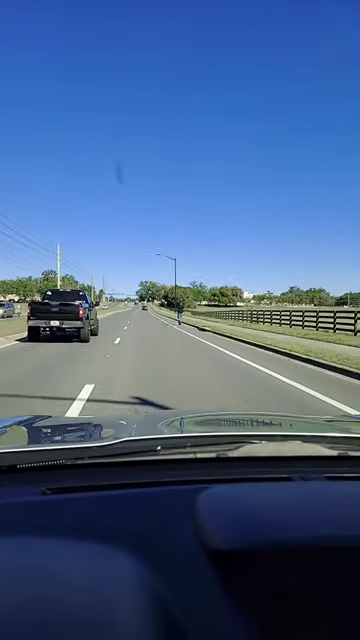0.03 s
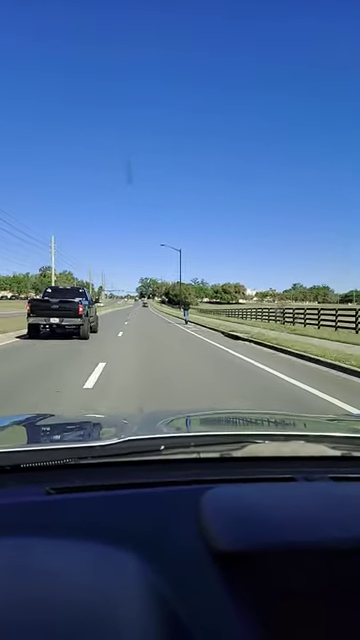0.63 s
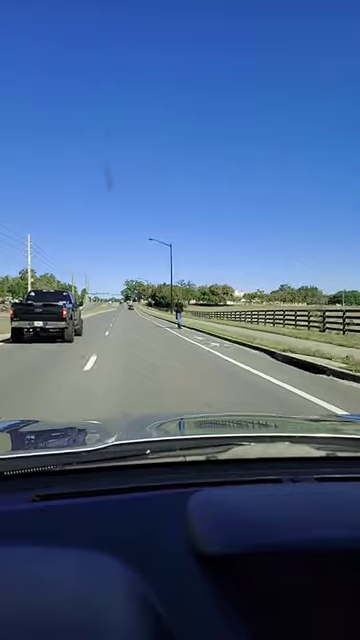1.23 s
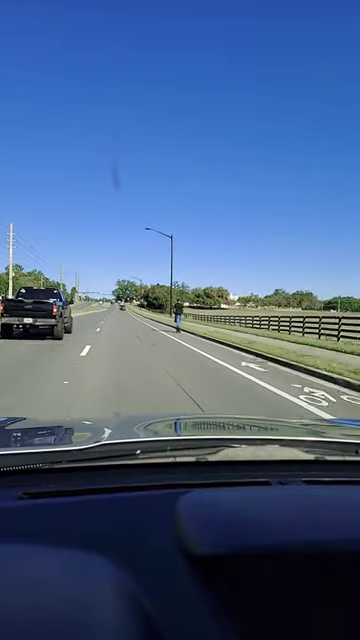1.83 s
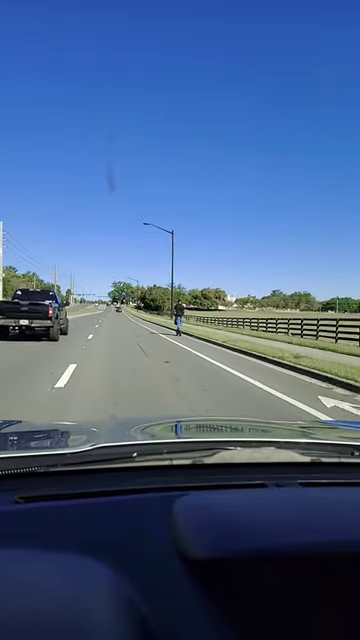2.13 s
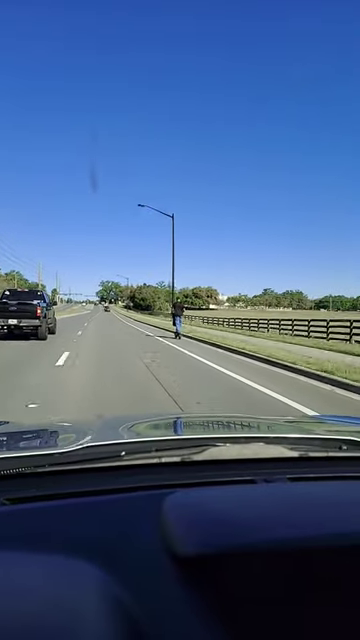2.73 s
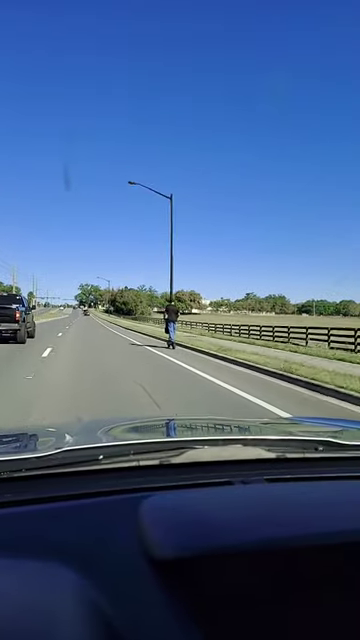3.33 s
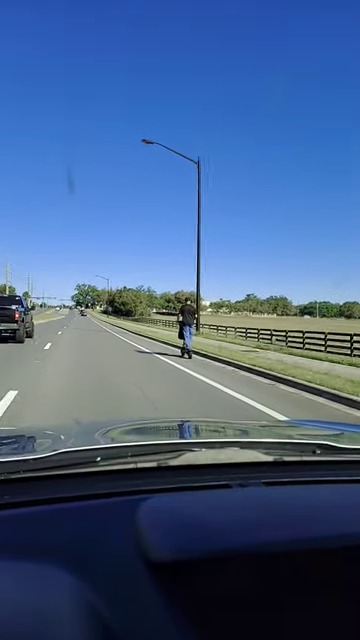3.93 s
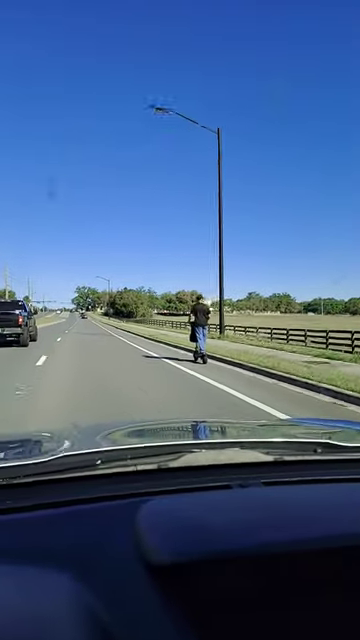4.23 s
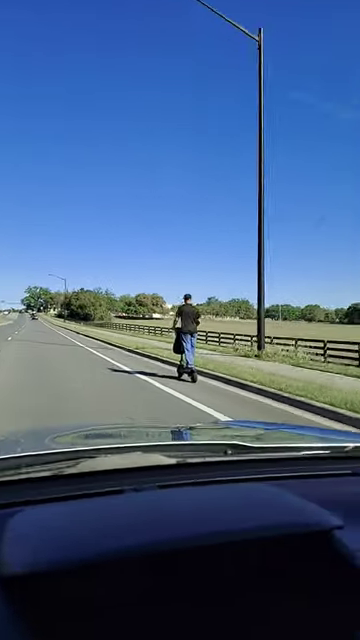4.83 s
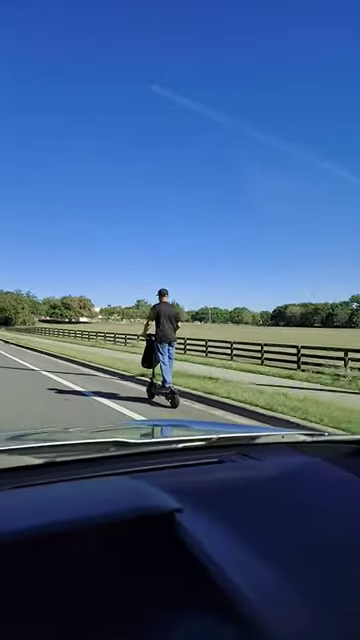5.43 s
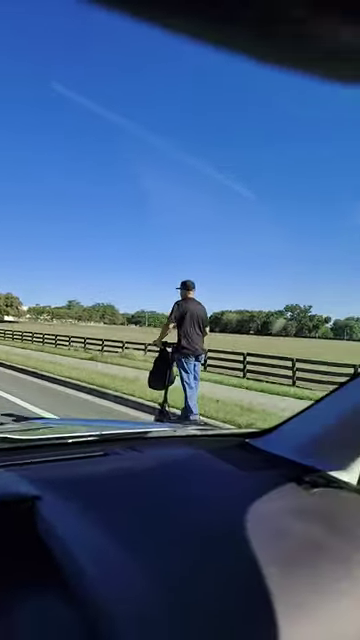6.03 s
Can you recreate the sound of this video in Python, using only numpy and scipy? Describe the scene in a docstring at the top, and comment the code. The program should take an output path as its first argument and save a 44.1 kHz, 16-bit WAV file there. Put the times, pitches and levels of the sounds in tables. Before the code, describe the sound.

A low, booming rumble inside a car cruising along a road, with tyre roar, bumps and wind rushing at an open window.

```python
"""A low, booming rumble fills a car cruising along a multi-lane road, heard from a hand-held phone.
The rough road and its bumps shake the body into that boom, and sharp edges knock through the wheels.
The tyres roar and hum, and air rushes and hisses at the lowered right window.
Stray gusts thump the microphones and pop on the left one, the phone ticks in the hand,
and near the end something gives one tiny squeak."""
import sys
import numpy as np
from scipy import signal
from scipy.fft import rfft, irfft
from scipy.io import wavfile
from scipy.ndimage import uniform_filter1d

SR = 44100
rng = np.random.default_rng(int(sys.argv[2]) if len(sys.argv) > 2 else 0)


def unload_wav(signal):
    """Save mono or channel-first audio to the path in sys.argv[1] as 16-bit WAV at rate SR, clipped to [-1, 1]."""
    wavfile.write(
        sys.argv[1],
        SR,
        np.round(np.clip(np.atleast_2d(signal).T, -1, 1) * 32767).astype(np.int16),
    )


N = 267687
T = np.arange(N) / SR
HZ = np.fft.rfftfreq(N, 1 / SR)

# Levels in the tables are relative: the functions set how loud each layer ends up.
# The path of the squeak. Each row: time in seconds, pitch in Hz, level in dB.
SQUEAK_PATH = [(6.008, 6950, -78), (6.016, 7500, -73), (6.034, 7830, -59), (6.06, 7400, -78)]
# Ticks of the phone case. Each row: time in seconds, level in dB, length of the slip in seconds,
# treble boost in dB per octave.
CASE_TICKS = [(0.647, -51, 0.00056, -7), (3.091, -51, .0005, -4), (3.399, -48, .0016, -4),
              (3.678, -50, 0.0016, -4), (4.2275, -36, .00008, 8), (4.319, -47, .0004, 2)]
# How the case rings. Each row: pitch in Hz, level in dB, seconds to fade by 60 dB.
CASE_RINGS = [(5400, -9, .0014), (8500, -9, 0.0017), (11300, -11, .0016), (13900, -4.5, 0.0026)]
# A fingertip sliding on the case. Each row: time in seconds, level in dB.
FINGER_SLIDE = [(4.33, -81), (4.38, -63), (4.45, -69), (4.54, -62), (4.6, -76)]

# Air speed at the window, given as loudness. Each row: time in seconds, level in dB.
AIR_SPEED = [(0, -42.5), (.6, -43.5), (1.15, -45), (1.5, -42), (2.1, -41), (2.55, -44), (3.2, -43.5),
             (4.1, -43.5), (4.45, -45), (5.0, -43), (5.14, -45), (5.45, -45.5), (5.8, -48.5), (6.07, -47)]
# The tone colour of the rushing air. Each row: frequency in Hz, level in dB.
RUSH_COLOUR = [(500, -3), (800, -4), (1050, 3), (1350, 1), (1650, 0), (1980, 0), (2300, -9.5),
               (2700, -15.5), (3100, -43.5), (5000, -60.5)]
# The tone colour of the hiss. Each row: frequency in Hz, level in dB.
HISS_COLOUR = [(1200, -19), (2500, 8), (3600, 3.5), (5000, 2), (6200, -2), (7300, -3), (8600, -12.5),
               (10000, -13), (12000, -12), (14200, -6.5), (15600, -17)]
# Puffs at the window's edge. Each row: middle and length in seconds, gap and hiss levels in dB.
WINDOW_PUFFS = [(0.25, 0.27, -55, -60), (0.872, 0.13, -46, -58.5), (1.6, 0.1, -49, -54.5),
                (2.249, 0.26, -41, -61.5), (2.745, 0.075, -44, -54), (3.64, .1, -62, -60),
                (3.963, 0.25, -66.5, -58), (4.902, 0.52, -53, -62.5)]
# How the window gap rings in a puff. Each row: pitch in Hz, width in Hz, level in dB.
GAP_RINGS = [(1620, 160, 3.5), (1960, 390, -2.5), (3530, 670, -24.5)]
# How alike the air sounds left and right. Each row: frequency in Hz, likeness (0 is unrelated).
AIR_STEREO = [(1200, 0.0083), (1500, 0.19), (1900, 0.25), (2400, .22), (2800, -0.036), (3200, -0.25),
              (3700, -0.14), (4500, -0.077), (7000, 0)]

# Gusts on the microphones, and one brief low thump on both sides near 0.74 s that goes with a knock from the
# road. Each row: middle and length in seconds, left and right levels in dB.
MIC_GUSTS = [(0.508, 0.073, -17, -22), (0.744, 0.019, -18.5, -19.5), (1.205, 0.044, -15.5, -42),
             (1.57, 0.085, -19, -35.5), (1.672, 0.11, -15.5, -37), (2.297, 0.06, -22, -34),
             (2.764, 0.054, -26, -31), (5.355, 0.32, -27.5, -24.5), (5.554, 0.19, -23, -19.5),
             (5.737, 0.2, -25, -28), (5.93, 0.13, -22.5, -30)]
# The tone colour of a gust. Each row: frequency in Hz, level in dB.
GUST_COLOUR = [(20, -35.5), (38, -8), (65, 7), (110, -1), (190, -6.5), (290, -12.5), (420, -22), (600, -35),
               (2500, -79.5)]
# Swirls of air that pop. Each row: time in seconds, rough half width in seconds, level in dB.
MIC_POPS = [(0.4894, 0.00095, -6), (0.5399, 0.0015, -5), (1.5586, 0.0012, -5), (1.6077, 0.00076, -11.5),
            (1.656, 0.0013, -10), (1.6944, 0.00079, -11), (1.707, 0.00098, -15), (5.499, 0.0028, -11),
            (5.5217, 0.00056, -14), (5.554, 0.0021, -14), (5.5803, 0.001, -11), (5.591, 0.0014, -13)]

# How coarse the asphalt is, given as loudness. Each row: time in seconds, level in dB.
ASPHALT_GRAIN = [(0, -37), (1.3, -39), (2.1, -38), (3.3, -38), (3.9, -39.5), (4.1, -37.5), (5.3, -38),
                 (5.7, -42), (6.07, -39.5)]
# The tone colour of the tyre roar. Each row: frequency in Hz, level in dB.
ROAR_COLOUR = [(200, -17.5), (450, -9.5), (560, 1), (760, 2), (860, -0.5), (960, -2.5), (1200, -7),
               (1600, -15), (2200, -19), (3200, -24.5), (5000, -47.5)]
# Where the tread sings in the roar. Each row: pitch in Hz, width in Hz, level in dB.
TREAD_RINGS = [(630, 41, 11), (790, 48, 8), (900, 60, 4.5), (985, 70, 5)]
# The tread's drifting whine. Each row: time in seconds, pitch in Hz, level in dB.
TREAD_WHINE = [(0, 916, -59.5), (3.5, 918, -56.5), (4.1, 914, -52.5), (4.6, 923, -50.5), (4.88, 966, -46),
               (5.45, 951, -55)]
# How alike the road sounds left and right. Each row: frequency in Hz, likeness (below 0 is opposed).
ROAD_STEREO = [(30, 0.73), (110, 1), (300, 0.93), (430, 0.83), (520, 0.59), (760, 0.57), (880, -0.67),
               (1100, 0.73), (1450, -2.2), (1900, 0.53), (3000, -0.35)]

# Hums of the rolling tyres and the drive. Each row: pitch in Hz, width in Hz, level in dB.
HUM_TONES = [(138.7, 15.9, 1.5), (292.7, 32, -9.5), (316, 8.1, -13)]
# How strong the hum is. Each row: time in seconds, level in dB.
HUM_LEVEL = [(0, -29.5), (1.1, -33), (4.8, -32.5), (5.15, -26.5), (6.07, -31)]
# Sharp edges in the road. Each row: time in seconds, level in dB.
ROAD_EDGES = [(.728, -17.5), (2.137, -18.5), (2.259, -17), (4.327, -14), (5.02, -19.5), (5.561, -14)]
# How the body panels ring. Each row: pitch in Hz, width in Hz, level in dB.
PANEL_RINGS = [(145, 68, 0.5), (192, 46, -4), (215.5, 41, -1.5), (297.3, 35.5, -0.5), (352.3, 32, -10),
               (403, 39, -9.5), (437.4, 15, -8), (487, 84, -13.5)]
# Bumps under the wheels. Each row: time of the hardest shake in seconds, pitch in Hz, level in dB.
ROAD_BUMPS = [(.487, 73.6, -18), (.839, 55, -13), (1.206, 65.7, -18), (1.496, 59, -18), (2.531, 56.66, -20),
              (2.68, 63, -14.5), (2.894, 53, -15), (3.409, 51, -18), (3.909, 51.05, -17), (4.79, 59, -13.5),
              (5.036, 54, -15), (5.266, 57.9, -21), (5.604, 63.1, -14.5)]
# How rough the road is between bumps. Each row: time in seconds, boom level in dB.
ROAD_ROUGHNESS = [(0, -19), (.45, -22.5), (.7, -21.5), (1.6, -21), (2.3, -22), (2.48, -18.5), (2.85, -19.5),
                  (3.2, -24), (3.6, -25), (4.1, -23), (4.6, -24.5), (6.07, -23)]
# The deep notes of body and cabin. Each row: pitch in Hz, width in Hz, level in dB.
CABIN_RINGS = [(22.6, 2.1, -11), (42.2, 4.5, -2.5), (56.2, 7.4, -2.5), (82.4, 26, -9), (113.4, 6.6, -17),
               (120.4, 1.7, -15.5)]
# The right microphone's duller treble. Each row: frequency in Hz, boost or cut in dB.
RIGHT_MIC_COLOUR = [(5500, 0.5), (7000, -2), (9500, 1.5), (12000, -4), (14000, -8), (15500, 1.5)]


def gain_of(db):
    """Turns decibels into a number to multiply a sound by."""
    return 10 ** (np.asarray(db) / 20)


def evened(x):
    """Scales a signal to an average strength (rms) of one."""
    return x / np.sqrt(np.mean(x ** 2) + 1e-20)


def spectrum(rows):
    """Joins a table's points into a value for every frequency, on a scale of octaves."""
    hz, value = np.transpose(rows)
    return np.interp(np.log(HZ + 1), np.log(hz + 1), value)


def level(rows, column=1):
    """Turns a table's dB column into a gain for every sample."""
    rows = np.array(rows)
    return gain_of(np.interp(T, rows[:, 0], rows[:, column]))


def pan(left_db):
    """Two gains that make the left side louder than the right by left_db."""
    return gain_of([[left_db / 2], [-left_db / 2]])


def resonances(rings):
    """A tone colour with a steep peak at each ringing pitch."""
    powers = (gain_of(db) ** 2 / (1 + ((HZ - hz) / width * 1.31) ** 2) ** 2 for hz, width, db in rings)
    return np.sqrt(sum(powers))


def noise(colour, likeness):
    """Noise with a given tone colour, partly alike at the two microphones."""
    a, b = rfft(rng.standard_normal((2, N)))
    same = np.clip(likeness, -.95, .95)
    mid, side = a * np.sqrt(1 + same), b * np.sqrt(1 - same)
    x = irfft(np.array([mid + side, mid - side]) * colour, N)
    return x / np.std(x.mean(0))


def wobble(rate_hz):
    """A smooth random wander, mostly slower than rate_hz."""
    return evened(irfft(rfft(rng.standard_normal(N)) / (1 + (HZ / rate_hz) ** 2), N))


def swell(s, length, order=4):
    """A smooth rise and fall around time s; a lower order has gentler slopes."""
    return 1 / (1 + ((T - s) / length * 2) ** order)


def steadied(x, size):
    """Evens out swells longer than size samples and keeps the faster throb."""
    power = uniform_filter1d(uniform_filter1d((x ** 2).mean(0), size), size)
    return x / np.sqrt(power / power.mean() + 1e-12)


def add(mix, s, sound):
    """Adds a stereo sound to the mix at s seconds."""
    part = mix[:, max(round(s * SR), 0):][:, :sound.shape[1]]
    part += sound[:, :part.shape[1]]


def squeak(jitter=.025):
    """One thin, unsteady tone that rises and falls."""
    s, hz, db = np.transpose(SQUEAK_PATH)
    pitch = np.interp(T, s, hz) * (1 + jitter * wobble(395))
    tone = np.sin(2 * np.pi * np.cumsum(pitch) / SR)
    return tone * gain_of(np.interp(T, s, db)) * (T > s[0]) * (T < s[-1]) * pan(6)


def handling(rise_s=0.00027):
    """Tiny slips and a sliding fingertip make the phone case ring, beside the right microphone."""
    out, t = np.zeros((2, N)), np.arange(256) / SR
    for s, db, length, treble_db in CASE_TICKS:
        snap = np.zeros(len(t))
        for hz, ring_db, fade_s in CASE_RINGS:
            octaves = np.log2(hz / CASE_RINGS[0][0])
            snap += gain_of(ring_db + treble_db * octaves - 60 * t / fade_s) * np.sin(2 * np.pi * hz * t)
        grit = np.sign(rng.standard_normal(len(t)))
        slip = grit * np.exp(-(2 * (t - t.mean()) / length) ** 2)
        tick = np.convolve(slip, snap * (1 - np.exp(-(t / rise_s) ** 2)))
        add(out, s - t.mean(), tick / abs(tick).max() * gain_of(db) * pan(-26))
    case_colour = resonances([(hz, 2.9 / fade_s, db) for hz, db, fade_s in CASE_RINGS])
    touching = (T > FINGER_SLIDE[0][0]) & (T < FINGER_SLIDE[-1][0])
    slide = noise(case_colour, 0) * level(FINGER_SLIDE) * touching
    return out + slide * gain_of(-6.5) * pan(-14)


def window_air(hiss_level_db=-60.5, flutter_db=1.2, flutter_hz=35):
    """Air rushes past the window, whose edge hisses and whistles; puffs lift the hiss and ring the gap."""
    speed, likeness = level(AIR_SPEED), spectrum(AIR_STEREO)
    gap_power = np.zeros(N)
    hiss_power = (gain_of(hiss_level_db) * evened(speed)) ** 2
    for s, length, gap_db, hiss_db in WINDOW_PUFFS:
        puff = swell(s, length, order=2)
        gap_power += (gain_of(gap_db) * puff) ** 2
        hiss_power += (gain_of(hiss_db) * puff) ** 2
    rush = noise(gain_of(spectrum(RUSH_COLOUR)), likeness) * speed * gain_of(-4) * pan(-11.5)
    gap = noise(resonances(GAP_RINGS), likeness) * np.sqrt(gap_power) * gain_of(-4) * pan(-10)
    hiss = noise(gain_of(spectrum(HISS_COLOUR)), likeness) * np.sqrt(hiss_power) * pan(0.55)
    flutter = gain_of(0.36 + flutter_db * wobble(flutter_hz))
    whistle = noise(resonances([(3467, 150, 0)]), .4) * speed * gain_of(-27) * pan(3.1)
    return rush + gap + hiss * flutter + whistle


def gusts(lumpy_db=2.5, swirl_hz=45, split_hz=170, brief_s=0.083):
    """Swirls of air thump each microphone; brief gusts carry more small swirls and sound harder."""
    lumps = gain_of(lumpy_db * np.array([wobble(swirl_hz), wobble(swirl_hz)]))
    swirls = noise(gain_of(spectrum(GUST_COLOUR)), 0) * lumps
    swirls = np.array([evened(steadied(mic[None], size=3000)[0]) for mic in swirls])
    large = irfft(rfft(swirls) / (1 + (HZ / split_hz) ** 4), N)  # large swirls are the bass
    small = swirls - large
    out = np.zeros((2, N))
    for s, length, left_db, right_db in MIC_GUSTS:
        blow = gain_of([[left_db], [right_db]]) * swell(s, length)
        out += blow * (large + small * min(brief_s / length, 1.3))
    return out * gain_of(-0.5)


def pops(suction=0.57):
    """A swirl hits the left microphone: a shallow dip, a spike of pressure, then a deeper suction."""
    out = np.zeros((2, N))
    for s, width, db in MIC_POPS:
        offset = (T - s) / width
        out[0] += gain_of(db) * (1 - suction * offset - offset ** 2) / (1 + offset ** 2 / 5) ** 4
    return out


def tyres(fuzz_hz=16):
    """The tread roars on the asphalt, dulled by doors and glass, and sings a faint, drifting whine."""
    colour = gain_of(spectrum(ROAR_COLOUR)) * HZ / (HZ + 100)
    roar = noise(colour, spectrum(ROAD_STEREO)) * gain_of(-5) * pan(3.55)
    s, hz, _ = np.transpose(TREAD_WHINE)
    pure = np.exp(2j * np.pi * np.cumsum(np.interp(T, s, hz)) / SR)
    fuzzy = np.array([(pure * (wobble(fuzz_hz) + 1j * wobble(fuzz_hz))).real for mic in range(2)])
    whine = noise(resonances(TREAD_RINGS), 0) * pan(12) * gain_of(-5) + fuzzy * pan(7)
    return roar * level(ASPHALT_GRAIN) + whine * level(TREAD_WHINE, column=2)


def knocks(ring_s=0.037, rise_s=0.0021, db_per_octave=-5):
    """An edge strikes the wheels and the body panels ring briefly, the higher ones more softly."""
    out, t = np.zeros((2, N)), np.arange(4096) / SR
    ring = np.zeros(len(t))
    for hz, width, db in PANEL_RINGS:
        strength = gain_of(db + db_per_octave * np.log2(hz / PANEL_RINGS[0][0]))
        ring += strength * np.sin(2 * np.pi * hz * t) * np.exp(-np.pi * width * t / 2)
    ring *= np.exp(-t / ring_s) * (1 - np.exp(-t / rise_s))
    for s, db in ROAD_EDGES:
        add(out, s, ring / abs(ring).max() * gain_of(db) * pan(0.89))
    return out


def bumps(sag=.1, spread_s=0.017):
    """A bump makes the cabin boom: it builds and fades equally fast while its pitch sags."""
    out = np.zeros(N)
    for s, hz, db in ROAD_BUMPS:
        offset = np.clip((T - s) / spread_s, -6, 6)
        cycles = rng.random() + np.cumsum(hz * (1 - sag * np.tanh(offset))) / SR
        out += gain_of(db) * np.sqrt(2) * np.exp(-offset ** 2 / 2) * np.sin(2 * np.pi * cycles)
    return out


def body_rumble(uneven_db=1.55, uneven_hz=6, churn_db=1.96, churn_hz=12):
    """The rough road makes the cabin boom and its panels drone, over the hum of tyres and drive."""
    likeness = spectrum(ROAD_STEREO)
    shake = level(ROAD_ROUGHNESS) * gain_of(uneven_db * wobble(uneven_hz))
    low_cut = 1 / np.sqrt(1 + (18 / (HZ + 1)) ** 8)
    boom = steadied(noise(resonances(CABIN_RINGS) * low_cut, likeness), size=4000) * shake
    drone = steadied(noise(resonances(PANEL_RINGS) * low_cut, likeness), size=7000)
    drone *= evened(gain_of(churn_db * wobble(churn_hz)))
    # The drone follows the asphalt closely and the shaking only a little.
    drone *= evened(level(ASPHALT_GRAIN)) ** 0.89 * evened(shake) ** 0.093
    hum = steadied(noise(resonances(HUM_TONES), .93), size=9000) * level(HUM_LEVEL)
    return boom * gain_of(1) * pan(-1.3) + drone * gain_of(-29) * pan(0.92) + hum * pan(4.7)


def scene():
    """Everything heard in the cabin."""
    road = body_rumble() + bumps() + knocks() + tyres()
    wind = window_air() + gusts() + pops()
    return road + wind + handling() + squeak()


def record(dry, top_hz=15650):
    """The right microphone colours its side, then the phone cuts off the highest treble."""
    right = irfft(rfft(dry[1]) * gain_of(spectrum(RIGHT_MIC_COLOUR)), N)
    treble_cut = signal.firwin(511, top_hz, window=("kaiser", 9), fs=SR)
    return signal.oaconvolve(np.array([dry[0], right]), treble_cut[None], "same")


dry = scene()
out = record(dry)
unload_wav(out)
```